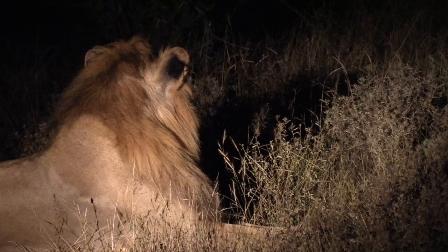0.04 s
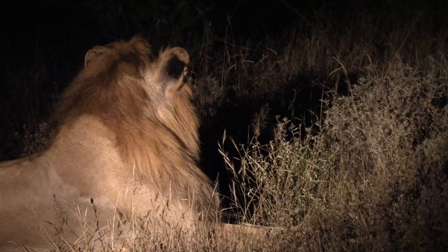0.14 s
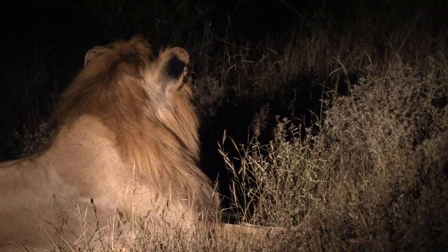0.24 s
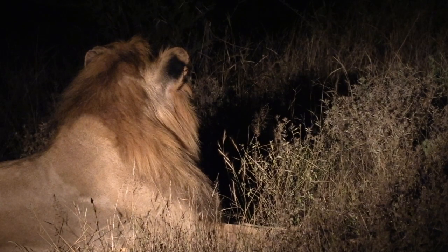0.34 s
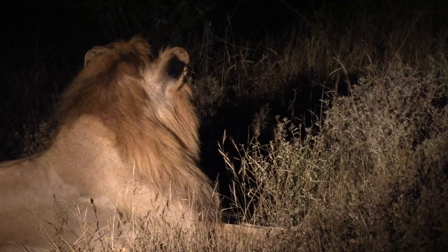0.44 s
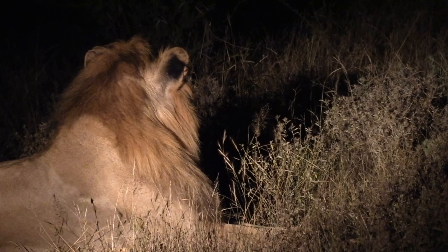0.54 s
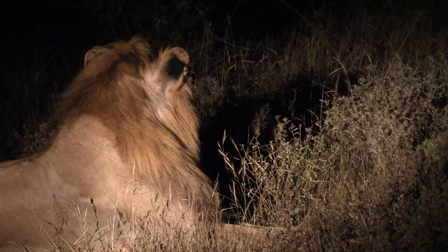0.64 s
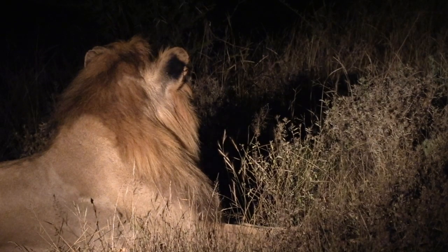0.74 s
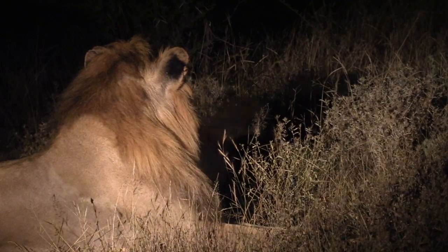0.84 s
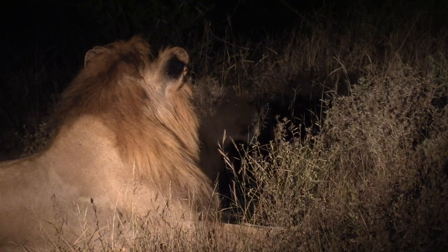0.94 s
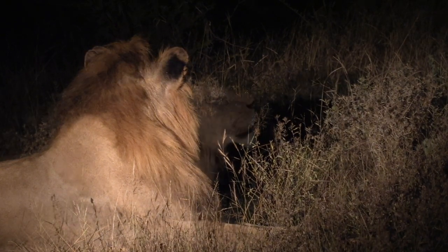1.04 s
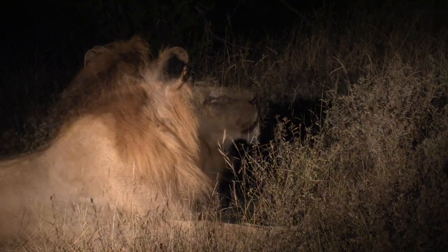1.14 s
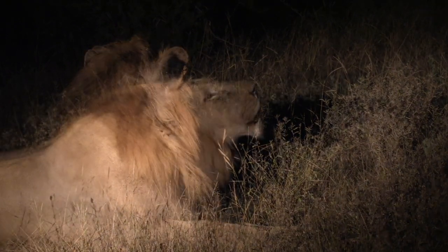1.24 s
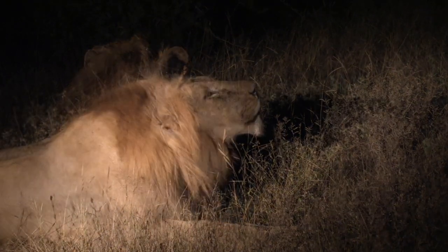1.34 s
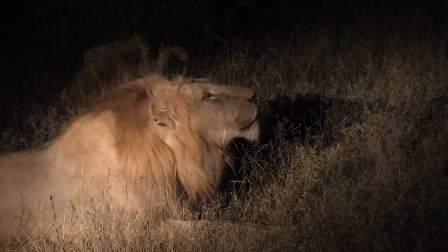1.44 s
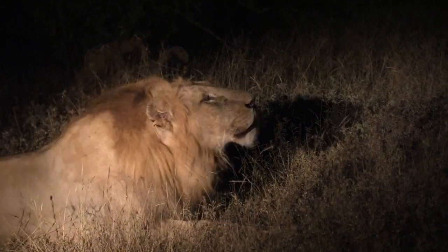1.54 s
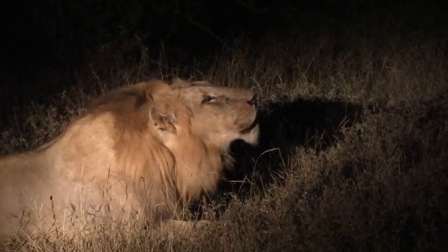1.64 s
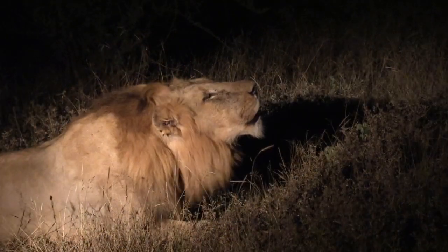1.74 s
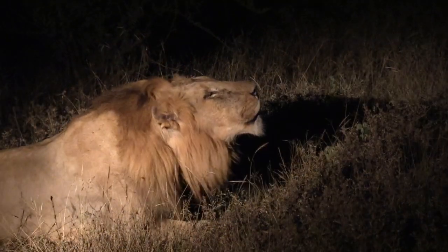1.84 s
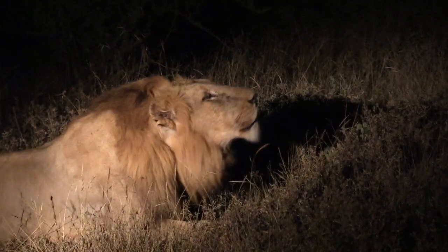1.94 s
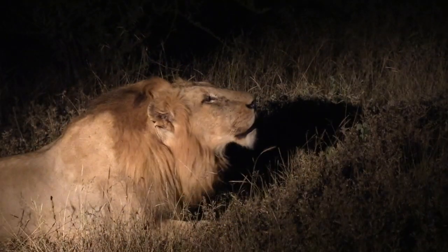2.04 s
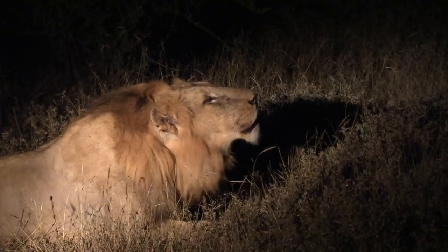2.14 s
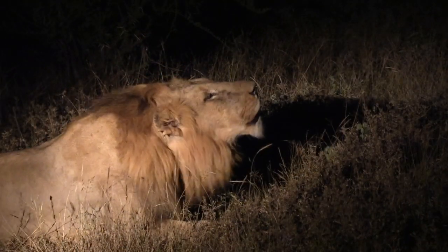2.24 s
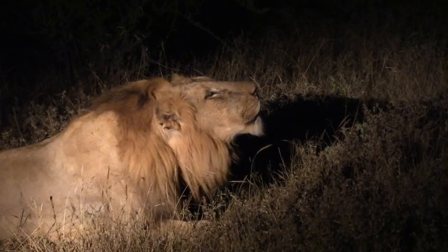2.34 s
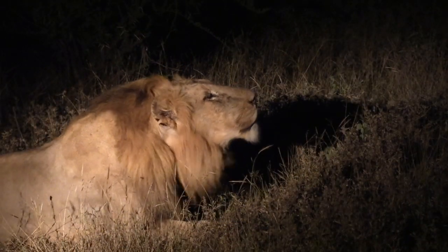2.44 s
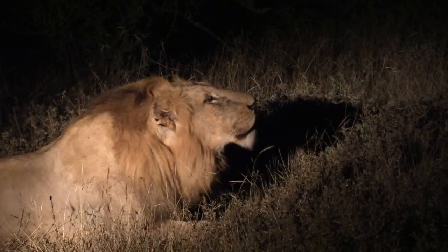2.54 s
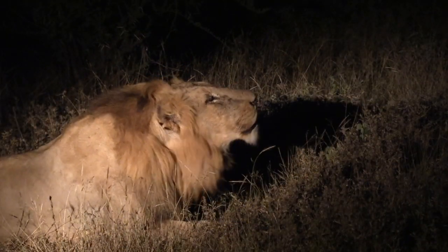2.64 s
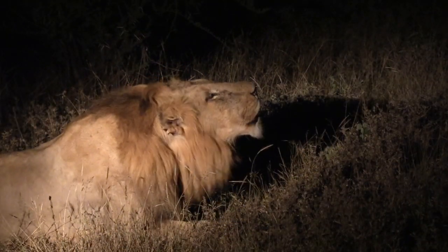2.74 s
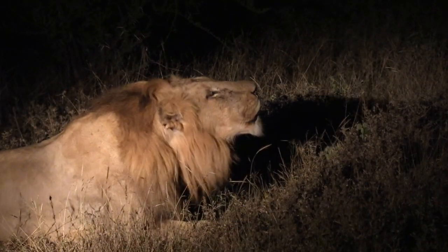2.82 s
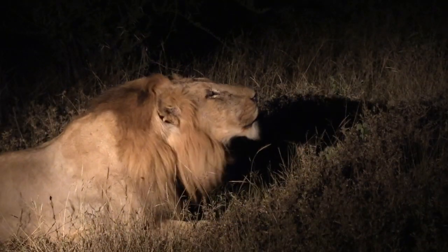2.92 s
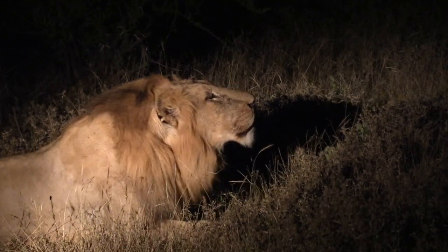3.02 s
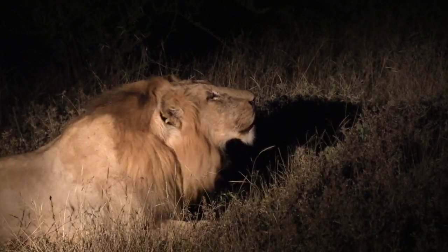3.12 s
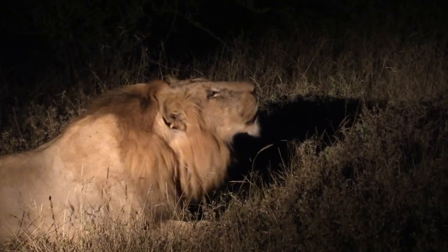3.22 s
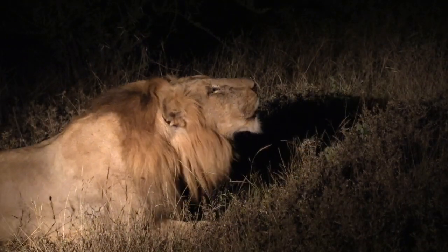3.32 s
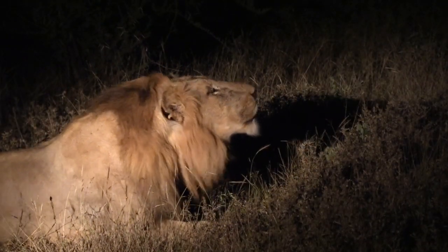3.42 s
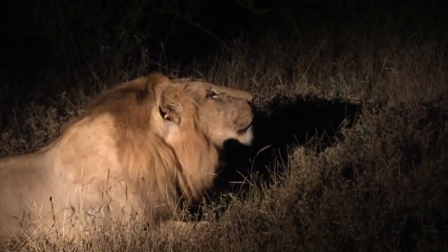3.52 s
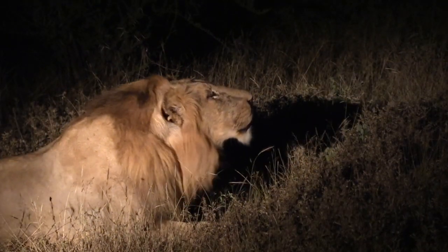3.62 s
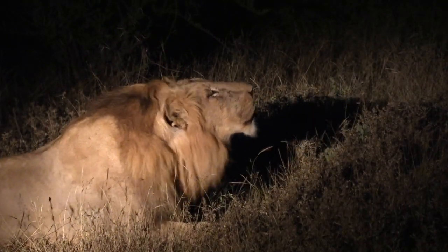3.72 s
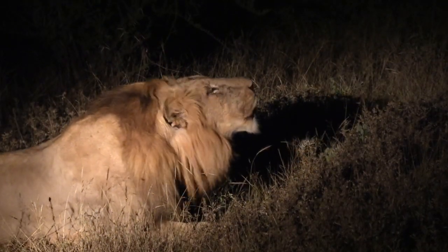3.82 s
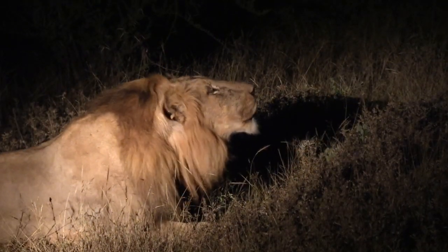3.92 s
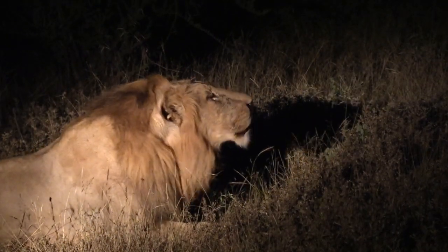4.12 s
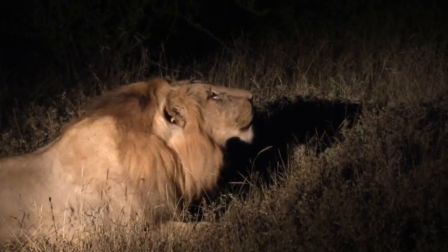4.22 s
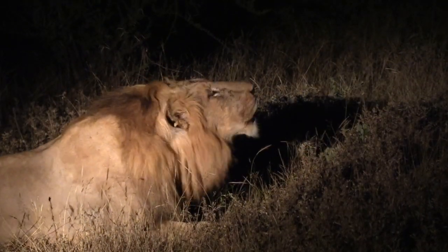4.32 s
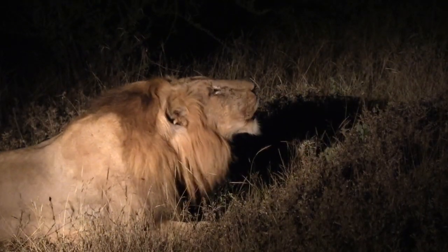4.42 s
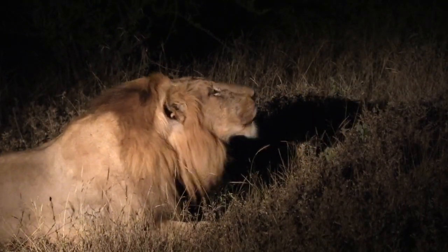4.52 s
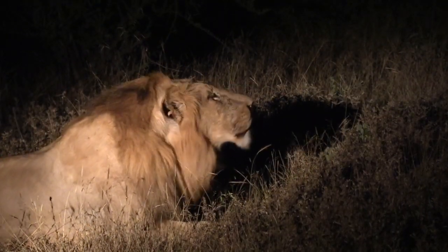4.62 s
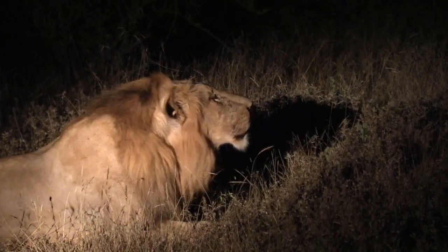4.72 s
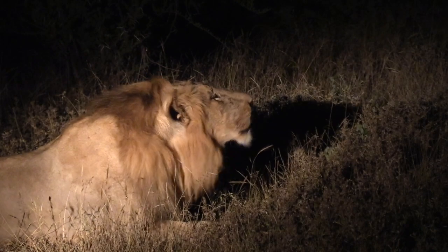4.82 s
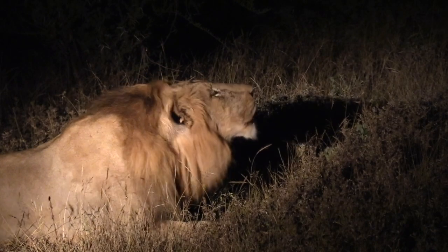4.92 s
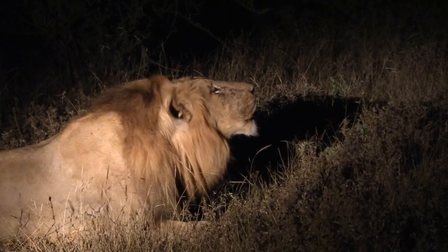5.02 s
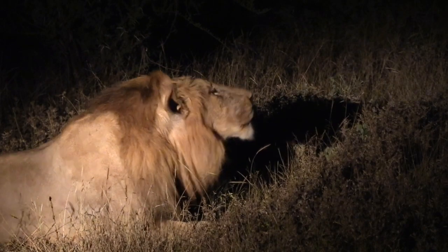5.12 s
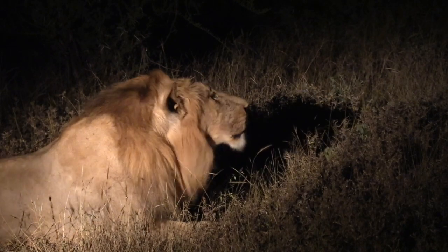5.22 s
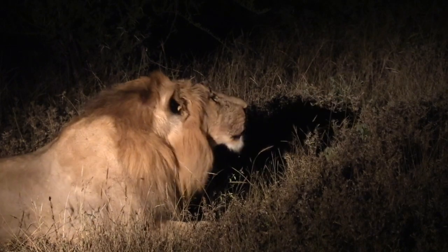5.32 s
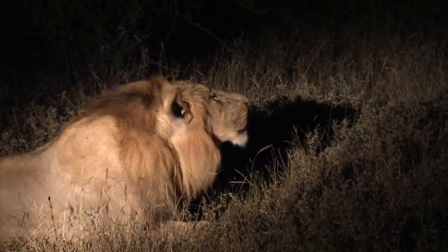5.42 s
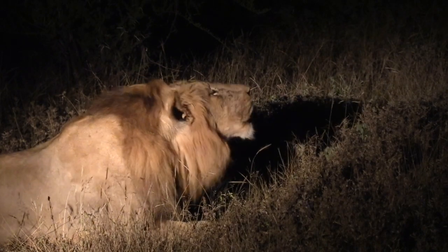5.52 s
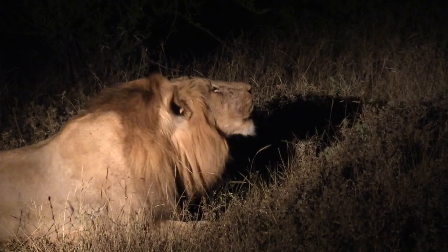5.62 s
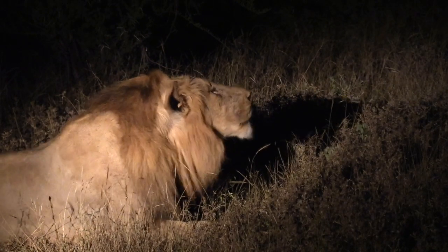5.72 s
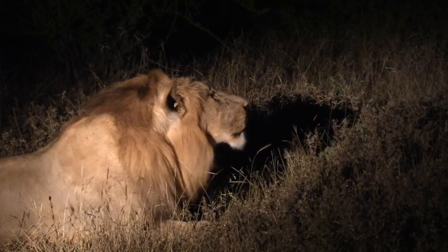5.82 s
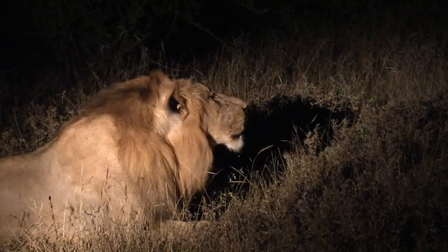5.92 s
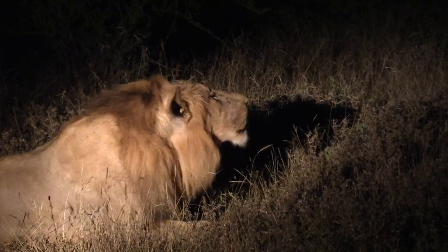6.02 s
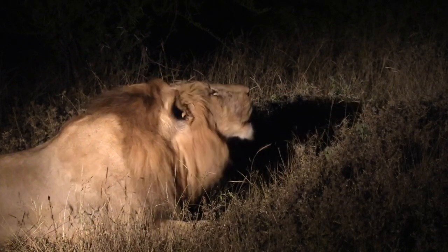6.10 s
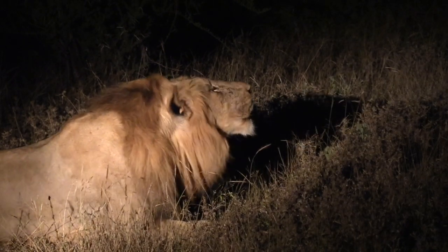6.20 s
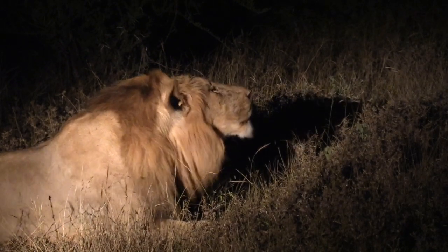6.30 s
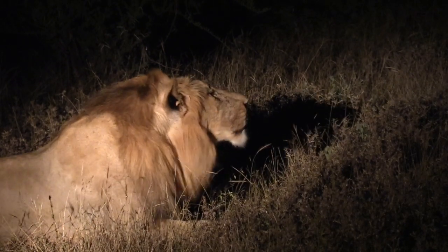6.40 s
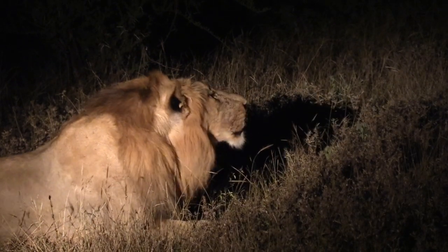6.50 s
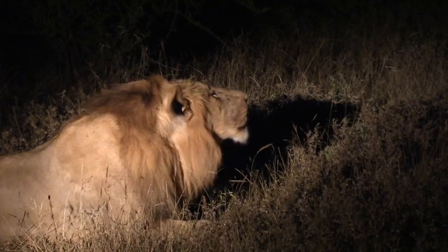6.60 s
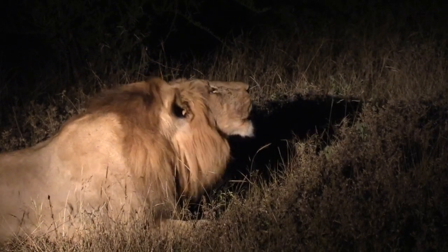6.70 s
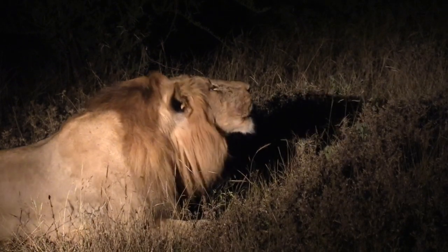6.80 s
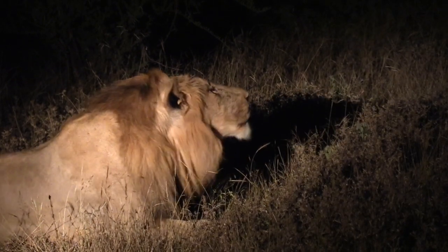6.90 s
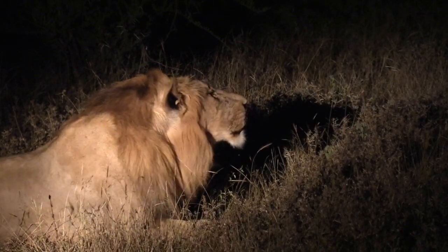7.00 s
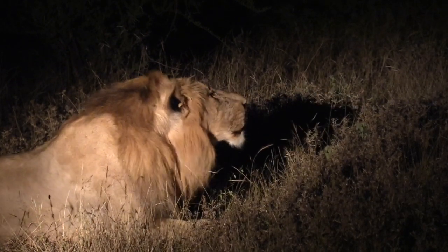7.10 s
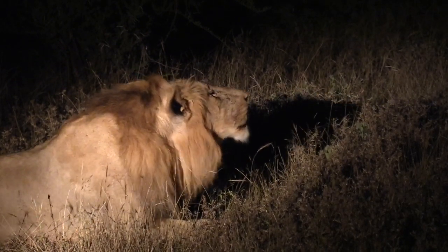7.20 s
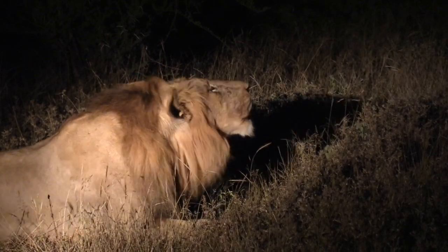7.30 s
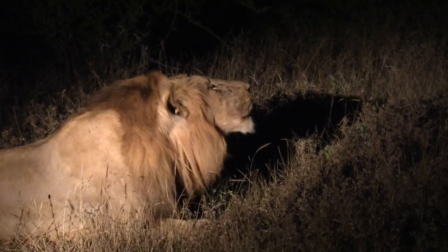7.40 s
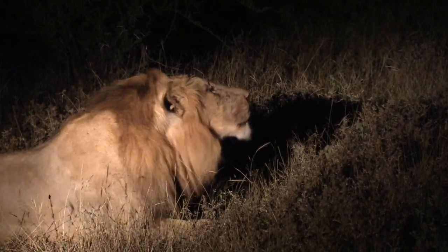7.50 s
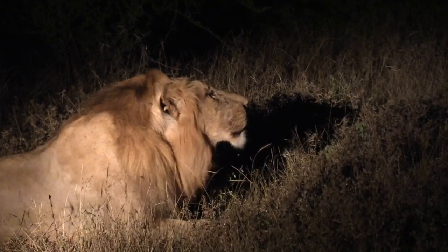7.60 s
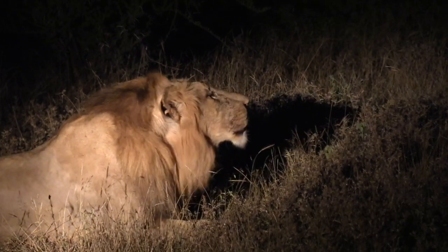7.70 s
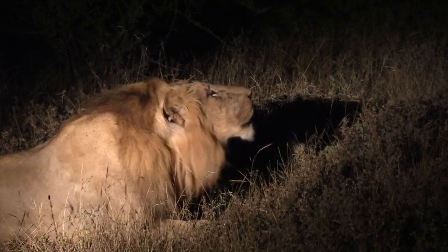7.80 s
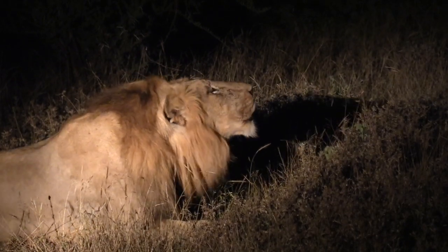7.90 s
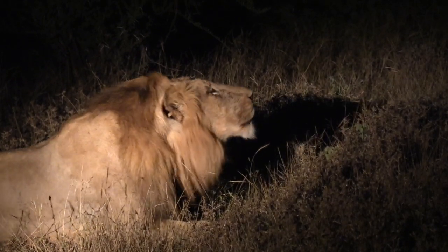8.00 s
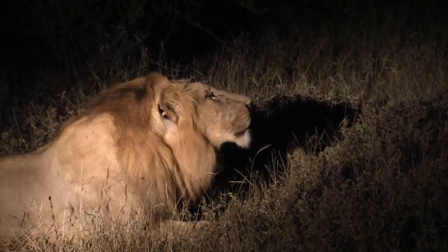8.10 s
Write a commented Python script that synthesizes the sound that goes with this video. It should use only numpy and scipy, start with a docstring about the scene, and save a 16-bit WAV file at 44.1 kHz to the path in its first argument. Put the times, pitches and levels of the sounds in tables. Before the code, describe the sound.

For the first second there is only a faint outdoor night hiss with steady, high insects and a tiny dry tick or two. At about 1.4 seconds a lion gives a soft first grunt, followed by twelve louder ones, roughly half a second apart and gradually slowing. Each is deep and hoarse, swelling quickly, dropping in pitch and breaking into a throaty rattle, with a quiet intake of air before it. The grunts are strongest around 4.5 to 5 seconds, and the last, slightly weaker, comes at 8 seconds. The bush adds a slight echo. Behind the lion, the hiss rises a little between 1 and 2.5 seconds, and faint cricket chirps and quick insect trills recur from about 2 seconds on. A far bird whistles thin notes from about 1.7 to 3.3 seconds and again from 6.5 to 8.

```python
"""A lion grunting at night.

A lion lying in the bush ends his roar with thirteen hoarse grunts, drawing air before each one.
His vocal folds chop the breath into pulses that ring at low, middle and high pitches. Each grunt
swells on a falling pitch, then the slack folds break into a slow rattle. All around, insects chirp
with their wings in the soft hiss of the night, and a far bird whistles."""
import sys
import numpy as np
from scipy import signal
from scipy.fft import rfft, irfft, next_fast_len
from scipy.io import wavfile
from scipy.ndimage import uniform_filter1d, map_coordinates

SR = 44100
rng = np.random.default_rng(int(sys.argv[2]) if len(sys.argv) > 2 else 0)


def put_to_file(sound):
    """Save the sound as 16-bit audio at rate SR, in the file named by the first command-line argument."""
    columns = np.atleast_2d(sound).T  # one column per channel
    safe = np.clip(columns, -1, 1)
    whole_steps = np.round(safe * 32767)
    wavfile.write(sys.argv[1], SR, whole_steps.astype(np.int16))


N = 359415
TIME = np.arange(N) / SR

# the grunts: (time of peak [s], swell [s], fade [s], pitch [Hz], chest level [dB], throat level [dB],
# rasp level [dB], extra rattle [dB], level of the breath before it [dB])
GRUNTS = [(1.402, 0.073, 0.16, 144.2, -35.5, -32, -38.5, 0.5, -65),
          (1.893, 0.073, 0.16, 138.5, -28, -25, -30.5, -2.5, -56.5),
          (2.385, 0.07, 0.15, 139, -26, -22, -28.5, 0.0, -50.5),
          (2.892, 0.073, 0.15, 140, -25.5, -23.5, -27.5, -0.5, -52),
          (3.406, 0.074, 0.16, 142.7, -25, -24.5, -27.5, 0, -48.5),
          (3.924, 0.072, 0.16, 138.8, -25, -22.0, -25, -2.5, -50),
          (4.485, 0.072, 0.16, 141.3, -22.5, -20.5, -25.5, 0, -47.5),
          (5.087, 0.078, 0.16, 138, -23.5, -21.5, -25.5, -2.0, -50.5),
          (5.681, 0.074, 0.17, 140.1, -24, -21.5, -27.0, 0, -52),
          (6.267, 0.066, 0.16, 139.2, -25, -22, -28, 1.5, -54.5),
          (6.841, 0.069, 0.16, 138, -26.0, -24, -26.5, 0.5, -50),
          (7.433, 0.066, 0.17, 138, -24.5, -23, -27, 0.5, -49.5),
          (7.984, 0.062, 0.15, 132.8, -29.5, -24.5, -29, 2.5, -52)]
# how every grunt unfolds: (time from peak [s], pitch [factor], unevenness [share], air [share],
# mouth opening [0-1])
GRUNT_COURSE = [(-.088, 1.17, .15, 1, 0.51), (-.053, 1.03, .08, 0.46, 0.15), (-.018, .99, .035, 0.33, 0.21),
                (.012, .9, .055, 0.3, 0.5), (.032, .76, .25, 0.48, 0.67), (.072, .54, .4, .5, 1),
                (.122, .4, .4, 0.57, 1), (.182, .4, .4, 0.5, 0)]
# how each part of the voice swells and fades: (rise [dB], curve of rise [exponent],
# drop as the folds go slack [dB], drop time [s], fade [dB], curve of fade [exponent])
CHEST_SHAPE = (17, 2.18, 4.1, 0.027, 31.6, 1.7)
THROAT_SHAPE = (19.1, 1.65, 9.5, 0.013, 44, 2.98)
RASP_SHAPE = (21.3, 2.84, 4, 0.013, 26.7, 3.12)
# fixed low, middle and high pitches at which the grunts ring in this place: (pitch [Hz], width [Hz],
# level [dB], change with open mouth [dB], left over right [dB])
LOW_RESONANCES = [(150.1, 32.8, 1.5, 10, 1), (173, 66, -17.5, 15.5, 10), (243.8, 29.4, -14, 14, 0.5)]
MIDDLE_RESONANCES = [(348.3, 38.5, -3.5, 6, -8.5), (391, 79, 6.5, -9, -1), (476.7, 91, 4.5, -13.5, 2),
                     (567, 47, -7.5, -2, -12), (664.8, 105, -17, 2, -8.5), (823, 142, -22.5, 9.5, 2.5)]
HIGH_RESONANCES = [(1027, 63.6, 8.5, -5.5, 4.5), (1091.4, 104, 3.5, -4, -10.5), (1229, 120, 4.5, -8, 4.5),
                   (1418, 129, -2, 7, 1), (1556, 210, -19.5, 16.5, 4.5), (1886, 185, -14.5, 3, 6.5),
                   (2182, 164, -15, 10, -10), (2677, 235, -20.5, 4.5, 5), (3006, 380, -22.5, 6.5, 1),
                   (3597, 490, -24.5, 10, -1), (4774, 890, -31.5, 10.5, 1), (5700, 560, -26.5, 1, -1),
                   (7470, 4000, -36, 0, 0.5), (8900, 1600, -47.5, 9, -2), (11600, 2300, -58, 1, -9)]
# single hard closures of the vocal folds: (time [s], relative level [dB])
SLAPS = [(1.4013, -23.5), (1.8392, -28), (2.379, -17), (2.5067, -27), (2.8453, -17.5), (2.9354, -16),
         (2.9568, -15), (3.3646, -15.5), (3.8772, -18), (3.9652, -18), (4.445, -30), (4.52, -12.5),
         (4.5944, -24), (5.0822, -7.5), (5.1425, -12), (5.1926, -21), (5.7118, -12), (5.724, -11.5),
         (6.3225, -10.5), (6.8384, -17), (7.4889, -16), (7.5121, -12.5)]
# tone colour of the air drawn in: (frequency [Hz], relative level [dB])
BREATH_COLOUR = [(60, -25), (140, -8), (230, -16), (390, 0), (720, -19), (1100, 0), (1500, -1), (2200, -20),
                 (4000, -32), (12000, -52)]
# ground and bushes shift the wave between the ears: (frequency [Hz], lead of the left ear [radians])
EAR_PHASE = [(150, 0.16), (280, 0.84), (335, 0), (420, -0.04), (530, 1.34), (600, 0.66), (800, 1.5),
             (1000, -0.3), (1170, 0.4), (1500, -0.12), (1900, -0.6), (3000, -0.28)]
# bird notes: (start [s], end [s], top pitch [Hz])
WHISTLES = [(1.715, 1.785, 1950), (2.12, 2.34, 2030), (2.645, 2.735, 1970), (2.78, 2.93, 1950),
            (2.99, 3.055, 1870), (3.065, 3.135, 1870), (3.14, 3.205, 1830), (3.21, 3.27, 1800),
            (3.275, 3.335, 1690), (6.495, 6.575, 1940), (6.93, 7.145, 2020), (7.59, 7.775, 1990),
            (7.78, 7.86, 1910), (7.87, 7.94, 1870)]
# fast insect trills: (start [s], end [s], relative level [dB])
TRILLS = [(1.7, 2.08, -49), (4.83, 5.04, -45.5), (5.91, 6.175, -44.5), (7.68, 7.93, -46.5)]
# cricket chirps: (start [s], end [s])
CHIRPS = [(2.06, 2.2), (2.54, 2.69), (3.15, 3.3), (3.62, 3.8), (4.25, 4.4), (4.52, 4.68), (5.22, 5.56),
          (5.96, 6.08), (6.3, 6.43), (6.59, 6.73), (6.9, 7.08), (7.23, 7.37), (7.53, 7.68)]
# steady insect choirs: (pitch [Hz], width [Hz], level against early air [dB], against late air [dB])
CHOIRS = [(3370, 360, -6.5, -11), (3476, 72, -8.5, -14), (2352, 100, -11.5, -14.5), (4900, 760, -7.5, -15),
          (5600, 180, -7.5, -47)]
# tone colours of the early air, the late air and a low rumble: (frequency [Hz], relative level [dB])
EARLY_AIR_COLOUR = [(30, -10), (300, -3.5), (1000, 3), (2300, 4.5), (3000, 4.5), (4200, 2.5), (5200, -11.5),
                    (6500, -3), (10000, -5.5), (15500, -19.5)]
LATE_AIR_COLOUR = [(30, -9), (90, -8.5), (250, -9), (1000, 1), (2000, 2), (3200, 3), (4200, -7.5),
                   (5200, 5), (7000, -10.5), (10000, -10), (15500, -23)]
RUMBLE_COLOUR = [(40, -19), (75, -28.5), (100, 3), (135, -7), (250, -9), (500, -11), (2000, -37)]
# how alike a noise is at the two ears: (frequency [Hz], likeness [0-1])
EAR_LIKENESS = [(60, 0.6), (150, 0.66), (400, 0.057), (1000, 0.033), (3000, 0.028), (15000, 0.098)]
# small dry ticks: (time [s], relative level [dB])
TICKS = [(0.4245, -43.5), (1.274, -42.5)]


def lion():
    """Pulses and puffs of air make a low chest tone, a throat tone and a high, airy rasp."""
    since, grunt = nearest_grunt()
    swell_s, fade_s, pitch_hz, chest_db, throat_db, rasp_db, rattle_db, breath_db = grunt
    pitch_factor, unevenness, air, opening = columns(GRUNT_COURSE, since)
    pulses, puffs = vocal_folds(pitch_hz * pitch_factor, unevenness)
    rattle_db = rattle_db + sputter()
    chest_swell_s = swell_s - 0.0062  # the chest sets in a little later
    chest_gain = from_db(chest_db) * loudness(CHEST_SHAPE, since, chest_swell_s, fade_s, rattle_db)
    throat_gain = from_db(throat_db) * loudness(THROAT_SHAPE, since, swell_s, fade_s, rattle_db)
    rasp_gain = from_db(rasp_db) * loudness(RASP_SHAPE, since, swell_s, fade_s, rattle_db)
    chest = resonate(pulses + 1.25 * air * puffs, LOW_RESONANCES, opening)
    throat = resonate(pulses + 1.15 * air * puffs, MIDDLE_RESONANCES, opening)
    throat += from_db(-2.5) * bush_echoes(throat, fade_s=.08, low_hz=530, high_hz=800)
    rasp = resonate(pulses + 5.4 * air * puffs, HIGH_RESONANCES, opening)
    rasp += from_db(3.5) * bush_echoes(rasp, fade_s=.07, low_hz=2700, high_hz=14998)
    throat = even_out(stretch_throat(throat, since, fall_per_s=0.4562, quiver=0), span_s=0.22)
    rasp = even_out(stretch_throat(rasp, since, fall_per_s=0.05763, quiver=.007), span_s=0.063)
    voice = (throat_gain * throat + rasp_gain * flare(rasp, since, swell_s)) * held_shut()
    voice += chest_gain * even_out(chest, span_s=0.095)
    # the deepest bass is cut from the grunts
    bass_cut = signal.butter(4, 96, "high", fs=SR, output="sos")
    return signal.sosfilt(bass_cut, voice + slaps(opening)) + breath_in(since, breath_db)


def nearest_grunt():
    """For every moment: the seconds since the nearest grunt's peak, and the rest of that grunt's row."""
    peak_s, *rest = np.transpose(GRUNTS)
    nearest = np.searchsorted((peak_s[1:] + peak_s[:-1]) / 2, TIME)
    return TIME - peak_s[nearest], [column[nearest] for column in rest]


def vocal_folds(rate_hz, unevenness, shimmer_db=7.0, puff_s=0.0091):
    """The folds close unevenly; each closure makes a pulse and a puff of rushing air."""
    cycles = np.cumsum(rate_hz * np.exp(unevenness * drift(60))) / SR
    closures = np.diff(np.floor(cycles), prepend=0)
    strength = from_db(shimmer_db * unevenness * drift(47))
    puff_fade = np.exp(-(cycles % 1) / rate_hz / puff_s)
    puffs = unit_level(puff_fade * rng.standard_normal(N)) * np.sqrt(closures.mean())
    return closures * strength, puffs * strength


def sputter(burst_db=4, bursts_per_s=26):
    """The slack folds rattle in uneven bursts that jump up and sag; gives a level change in dB."""
    burst_age = np.cumsum(bursts_per_s * np.exp(.4 * drift(20))) / SR % 1
    return burst_db * uniform_filter1d(.5 - burst_age, size=110)


def loudness(shape, since, swell_s, fade_s, rattle_db, catch_s=0.015):
    """A grunt starts abruptly, swells, drops as the folds go slack, and fades ever faster."""
    rise_db, rise_curve, drop_db, drop_s, fade_db, fade_curve = shape
    before, after = np.maximum(-since, 0), np.maximum(since, 0)
    onset = np.clip((1.254 * swell_s - before) / catch_s, 0, 1)
    slack = 1 - np.exp(-(after / drop_s) ** 2)
    below_peak_db = rise_db * (before / swell_s) ** rise_curve + fade_db * (after / fade_s) ** fade_curve
    return onset * from_db(slack * (rattle_db - drop_db) - below_peak_db)


def resonate(source, resonances, opening):
    """The source rings at fixed pitches; their balance shifts as the mouth opens."""
    shut = signal.oaconvolve((source * (1 - opening))[None], ringing(resonances, opening=0), axes=1)
    wide = signal.oaconvolve((source * opening)[None], ringing(resonances, opening=1), axes=1)
    return (shut + wide)[:, :N]


def ringing(resonances, opening, size=8192):
    """How a set of resonances rings at each ear after a single pulse."""
    frequency = np.maximum(np.arange(size // 2 + 1) * SR / size, 1)
    power = 1e-12
    for hz, width, db, open_db, side_db in resonances:
        detune = (frequency ** 2 - hz ** 2) / (frequency * width)
        power = power + (pan(side_db) * from_db(db + open_db * opening) / (1 + detune ** 2)) ** 2
    # these steps (minimum phase) make sure that nothing rings before it is struck
    cepstrum = irfft(np.log(power) / 2)
    cepstrum[:, 1:size // 2] *= 2
    cepstrum[:, size // 2 + 1:] = 0
    return irfft(np.exp(rfft(cepstrum)))


def stretch_throat(sound, since, fall_per_s, quiver, quivers_per_s=12):
    """The throat lengthens during a grunt, so the sound sinks; the quivering jaw makes it waver."""
    lag_s = fall_per_s * np.clip(since, -.25, .25) ** 2 / 2
    waver_s = quiver * drift(quivers_per_s) / (2 * np.pi * quivers_per_s)
    read_at = (TIME - lag_s + waver_s) * SR  # reading a sound more slowly lowers it
    return np.array([map_coordinates(ear, [read_at], order=3) for ear in sound])


def flare(rasp, since, swell_s, dull_db=7.5, flare_db=2, tiring_db_per_s=0.29):
    """The rasp starts dull and brightens at each peak, less so as the lion tires."""
    treble = signal.sosfiltfilt(signal.butter(3, 1650, "high", fs=SR, output="sos"), rasp)
    swell_db = dull_db * np.clip(since / swell_s, -1, 0)
    peak_db = flare_db * np.exp(-((since - 0.007) / 0.013) ** 2)
    freshness_db = 1 - tiring_db_per_s * (TIME - GRUNTS[0][0])
    return rasp + treble * (from_db(swell_db + peak_db + freshness_db) - 1)


def held_shut(hold_s=0.0104, depth=0.22):
    """The voice dips as the folds stay shut for a moment and pressure builds for a slap."""
    shut = np.zeros(N)
    for time_s, _ in SLAPS:
        shut[round((time_s - hold_s) * SR):round(time_s * SR)] = 1
    return 1 - depth * uniform_filter1d(shut, size=90)


def slaps(opening):
    """Single hard closures of the folds make knocks that ring at the middle and high pitches."""
    clicks = np.zeros(N)
    for time_s, db in SLAPS:
        clicks[round(time_s * SR)] = from_db(db)
    clicks = signal.sosfilt(signal.butter(1, 2000, fs=SR, output="sos"), clicks)  # soft flesh dulls them
    knocks = resonate(clicks, HIGH_RESONANCES, opening)
    knocks += from_db(1.5) * resonate(clicks, MIDDLE_RESONANCES, opening)
    loudest_db = max(db for _, db in SLAPS) - 3
    return from_db(loudest_db) * knocks / np.abs(knocks).max()


def breath_in(since, level_db, lead_s=0.15, half_length_s=0.048):
    """A short rush of air is drawn in before each grunt."""
    swell = np.exp(-((since + lead_s) / half_length_s) ** 2)
    return from_db(level_db) * swell * coloured_noise(BREATH_COLOUR, flicker_db=2)


def at_the_ears(sound):
    """Each pitch reaches one ear a little ahead of the other."""
    size = next_fast_len(N + SR)
    lead, = columns(EAR_PHASE, np.arange(size // 2 + 1) * SR / size)
    return irfft(rfft(sound, size) * np.exp(.5j * lead * [[1], [-1]]), size)[:, :N]


def bush_echoes(sound, fade_s, low_hz, high_hz):
    """Countless small echoes from grass and bushes, different at each ear."""
    age = np.arange(int(fade_s * SR)) / SR
    echoes = rng.standard_normal((2, len(age))) * from_db(-60 * age / fade_s)
    echoes /= np.sqrt(np.sum(echoes ** 2, axis=1, keepdims=True))
    band = signal.butter(2, [low_hz, high_hz], "band", fs=SR, output="sos")
    return signal.sosfilt(band, signal.fftconvolve(sound, echoes, axes=1)[:, :N])


def bird(climb_hz=570, drop_s=.036):
    """Pure whistles that climb to a top note and drop back in their last moments."""
    notes = np.zeros(N)
    for start, end, top_hz in WHISTLES:
        during = (TIME > start) & (TIME < end)
        from_top = np.interp(TIME[during], [start, end - drop_s, end], [-1, 0, 1])
        hz = top_hz - climb_hz * np.abs(from_top) ** 1.3
        notes[during] += (1 - from_top ** 2) ** .35 * np.sin(2 * np.pi * np.cumsum(hz) / SR)
    return notes * from_db(-51 + 1.5 * drift(25))


def insect(bursts, strokes_per_s, tone_hz, fall_hz, sounding_share):
    """Each wing stroke is a short tone that falls in pitch and wavers."""
    song = np.zeros(N)
    waver_hz = 65 * drift(120)
    for start, end, db in bursts:
        during = (TIME > start) & (TIME < end)
        stroke = np.minimum((TIME[during] - start) * strokes_per_s % 1 / sounding_share, 1)
        swell = signal.windows.tukey(during.sum(), .3) * np.sin(np.pi * stroke)
        hz = tone_hz + waver_hz[during] - fall_hz * (stroke - .5)
        song[during] += from_db(db) * swell * np.sin(2 * np.pi * np.cumsum(hz) / SR)
    return song * from_db(1.5 * drift(15))


def night():
    """A faint hiss gives way to a louder one, with far insect choirs and a brief rumble at the start."""
    early = from_db(-63 - 1.5 * TIME) * (1 - ramp(0.96, 1.5))
    late = from_db(-50.5) * ramp(0.97, 2.54)
    air = early * coloured_noise(EARLY_AIR_COLOUR, flicker_db=1.2)
    air += late * coloured_noise(LATE_AIR_COLOUR, flicker_db=1.1)
    for hz, width_hz, early_db, late_db in CHOIRS:
        choir = noise_band(hz, width_hz) * from_db(1.2 * drift(30))
        air += choir * (early * from_db(early_db) + late * from_db(late_db))
    air += early * from_db(-7) * katydid()
    rumble = from_db(-58.5 - 63 * TIME) * coloured_noise(RUMBLE_COLOUR, flicker_db=2.5)
    return air + rumble


def katydid(period_s=.0875, first_s=0.073):
    """A bush cricket makes high scrapes at an even pace."""
    scrapes = np.cos(np.pi * (TIME - first_s) / period_s) ** 6
    return scrapes * noise_band(hz=10550, width_hz=1900)


def ticks(fade_s=0.0036):
    """Small dry ticks: bursts of noise that die away at once."""
    bursts = sum(from_db(db - 3.5) * (TIME > time_s) * np.exp(-np.abs(TIME - time_s) / fade_s)
                 for time_s, db in TICKS)
    return bursts * noise_band(hz=1560, width_hz=2200)


def noise_band(hz, width_hz):
    """Stereo noise around one pitch, sent through a resonance twice for steep edges."""
    r = np.exp(-np.pi * width_hz / SR)
    resonance = [(1 - r * r) / 2, 0, (r * r - 1) / 2, 1, -2 * r * np.cos(2 * np.pi * hz / SR), r * r]
    return unit_level(signal.sosfilt([resonance, resonance], rng.standard_normal((2, N))))


def coloured_noise(colour, flicker_db):
    """Stereo noise in half-octave bands, each with its own level, flicker and likeness at the ears."""
    noise = 0
    edges_hz = 30 * 2 ** np.arange(0, 9.6, .5)
    white = rng.standard_normal((2, 2, N))
    curves = [np.transpose(table) for table in (colour, EAR_LIKENESS)]
    for k, (low, high) in enumerate(zip(edges_hz, edges_hz[1:])):
        band = signal.butter(2, [low, high], "band", fs=SR, output="sos")
        shared, opposed = signal.sosfilt(band, white[k % 2])
        log_centre = np.log(low * high) / 2
        level_db, alike = (np.interp(log_centre, np.log(hz), values) for hz, values in curves)
        stereo = np.sqrt(1 + alike) * shared + np.sqrt(1 - alike) * opposed * [[1], [-1]]
        noise = noise + from_db(level_db + flicker_db * drift(13)) * stereo
    return unit_level(noise)


def drift(rate_hz):
    """A smooth random wander, typically about 1 in size."""
    r = np.exp(-80 * np.pi * rate_hz / SR)
    steps = rng.standard_normal(N // 40 + 2002)  # one for every 40 samples, plus a run-up
    slow = signal.lfilter([1], [1, -2 * r, r * r], steps)[2000:]
    return np.interp(np.arange(N) / 40, np.arange(len(slow)), unit_level(slow))


def even_out(sound, span_s):
    """Evens out slow changes of level and keeps the single pulses."""
    size = int(span_s * SR / 2)
    power = uniform_filter1d(uniform_filter1d(sound.mean(axis=0) ** 2, size), size)
    return sound / np.sqrt(np.abs(power) + 1e-14)


def columns(table, at):
    """Looks up places in a table's first column and reads the other columns there."""
    places, *rest = np.transpose(table)
    return [np.interp(at, places, column) for column in rest]


def ramp(start_s, end_s):
    """Rises evenly from 0 to 1 between two times."""
    return np.clip((TIME - start_s) / (end_s - start_s), 0, 1)


def pan(db):
    """Gains for the two ears, with the left louder by the given decibels."""
    return from_db(np.array([[db], [-db]]) / 2)


def from_db(db):
    """Turns decibels into a factor to multiply by."""
    return 10 ** (np.asarray(db) / 20)


def unit_level(sound):
    """Scales a sound to an average power of 1."""
    return sound / np.sqrt(np.mean(sound ** 2) + 1e-20)


def scene():
    """The lion, the far bird and the insects echo off the bushes, over the night air."""
    grunts = pan(0.63) * at_the_ears(lion())
    grunts += from_db(-17.5) * bush_echoes(grunts, fade_s=0.5, low_hz=100.07, high_hz=3000)
    trills = insect(TRILLS, strokes_per_s=48.1, tone_hz=4724, fall_hz=748, sounding_share=0.59)
    chirp_bursts = [(start, end, -53.5) for start, end in CHIRPS]  # all at one level [dB]
    chirps = insect(chirp_bursts, strokes_per_s=27.5, tone_hz=5010, fall_hz=220, sounding_share=.8)
    far = bird() + pan(.8) * trills + pan(-.8) * chirps
    far = from_db(-2) * far + from_db(-7) * bush_echoes(far, fade_s=.15, low_hz=800, high_hz=8000)
    return grunts + far + night() + ticks()


def record(dry):
    """The very highest treble is cut steeply."""
    return signal.sosfilt(signal.ellip(12, .1, 80, 15720, fs=SR, output="sos"), dry)


dry = scene()
out = record(dry)
put_to_file(out)
```